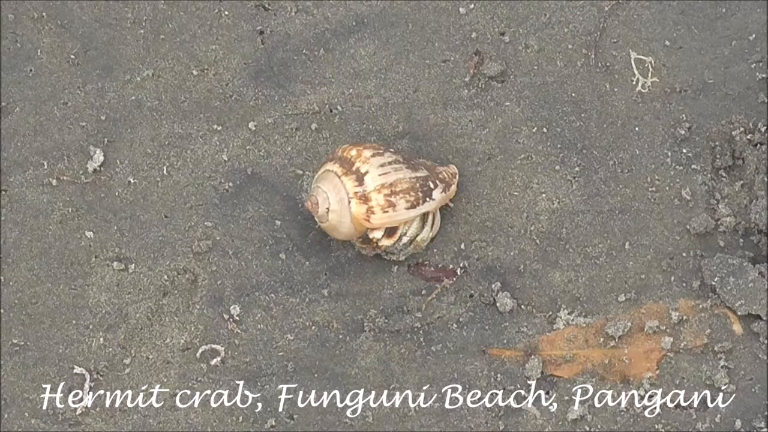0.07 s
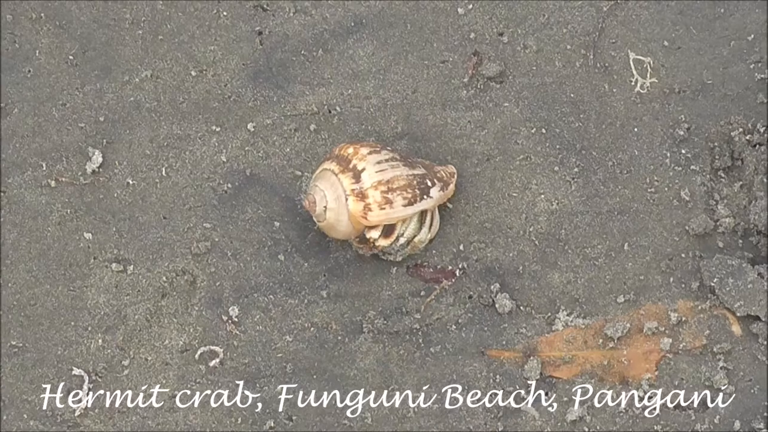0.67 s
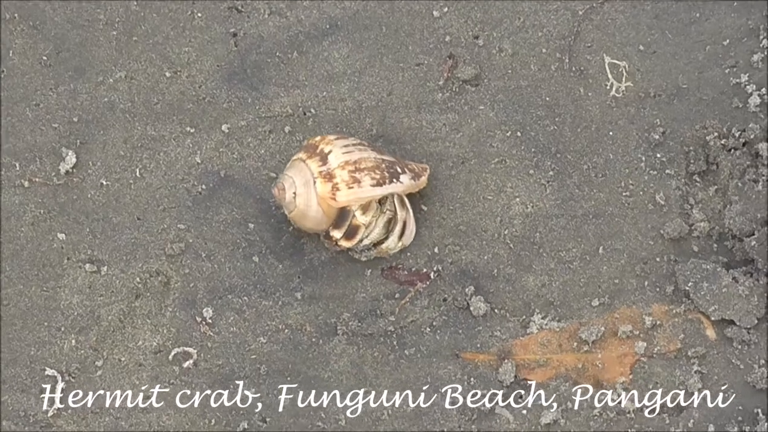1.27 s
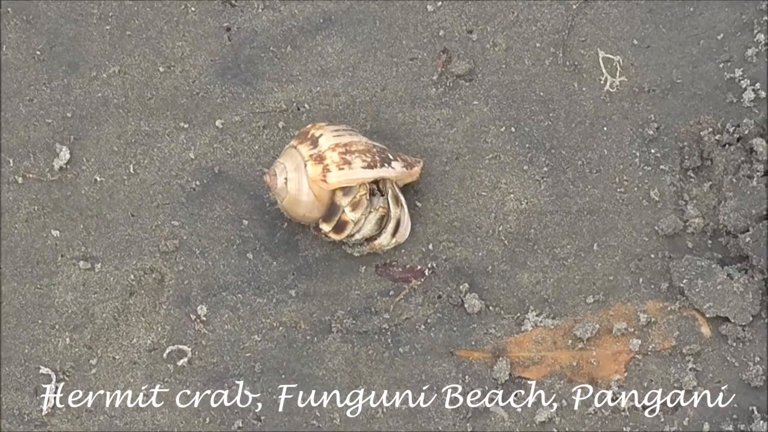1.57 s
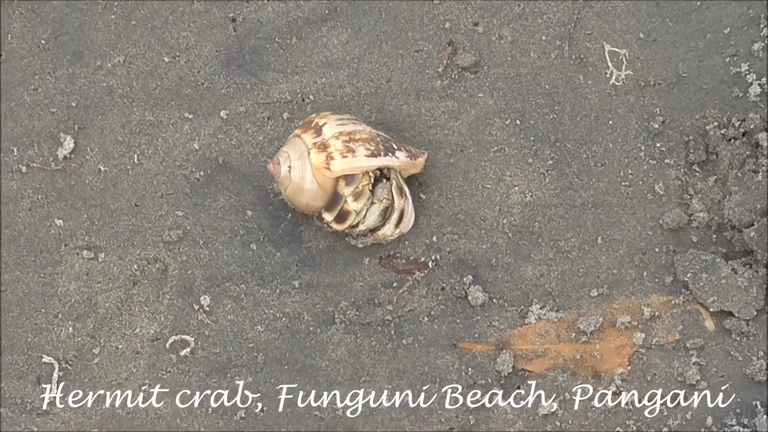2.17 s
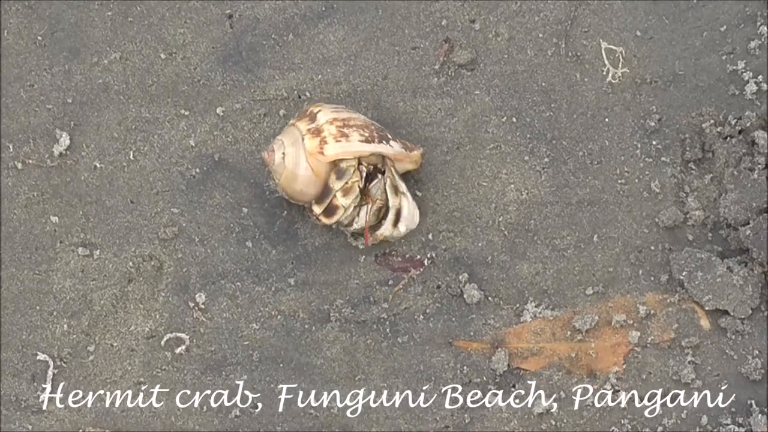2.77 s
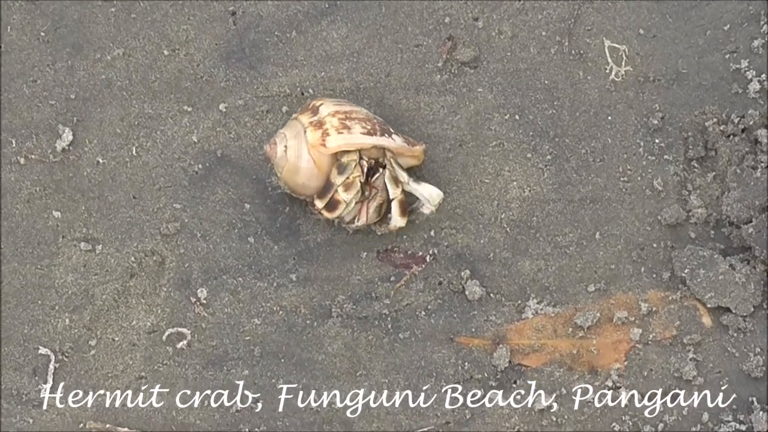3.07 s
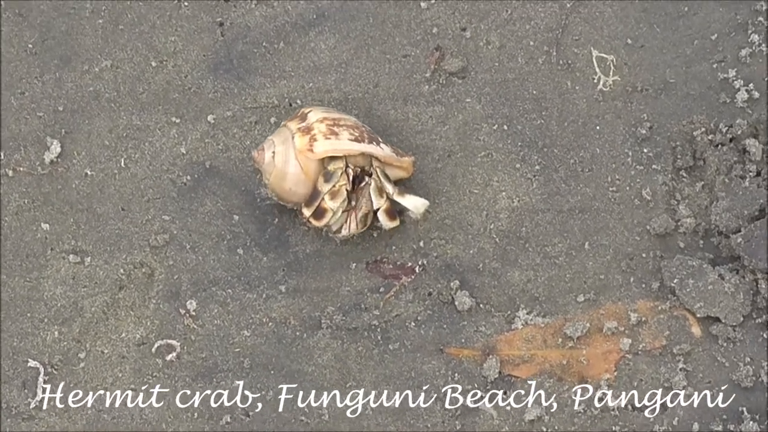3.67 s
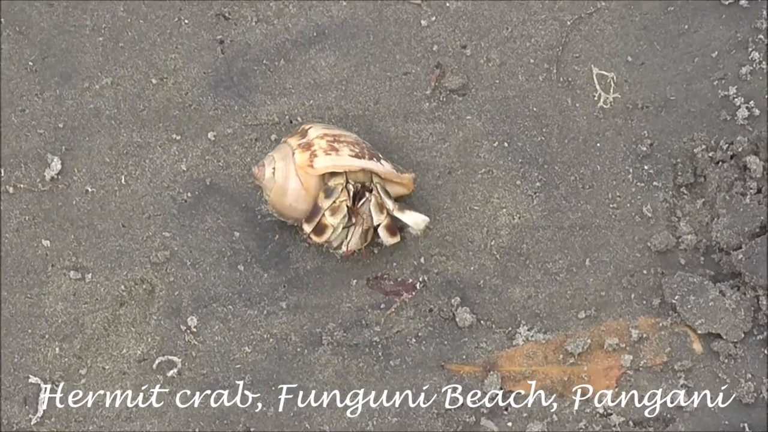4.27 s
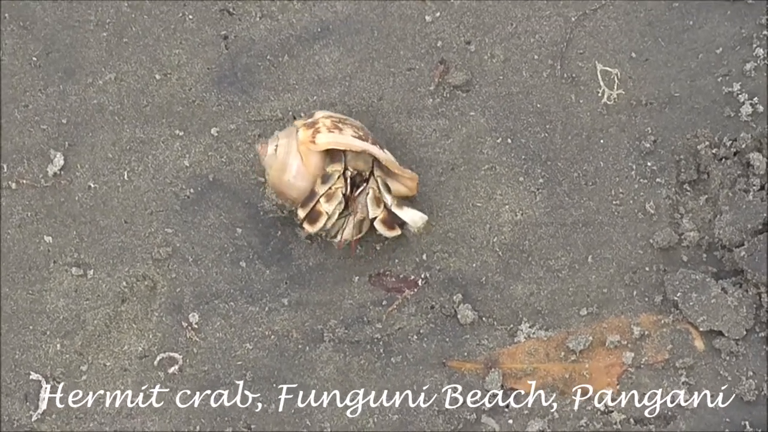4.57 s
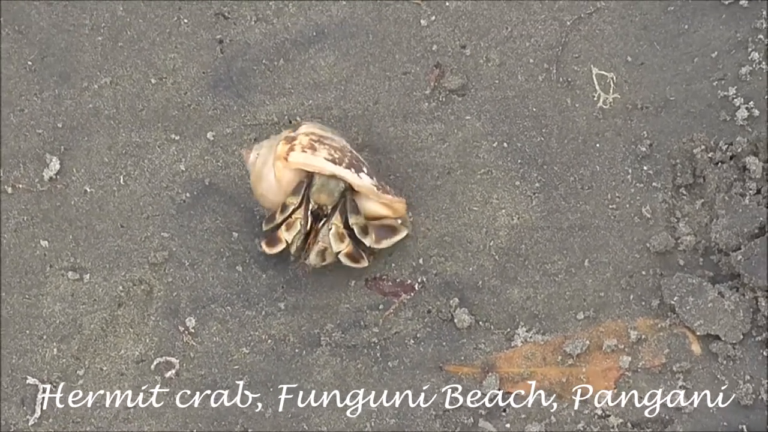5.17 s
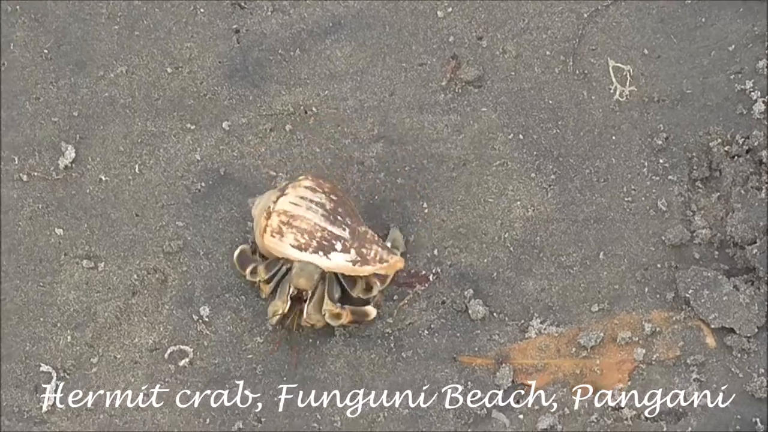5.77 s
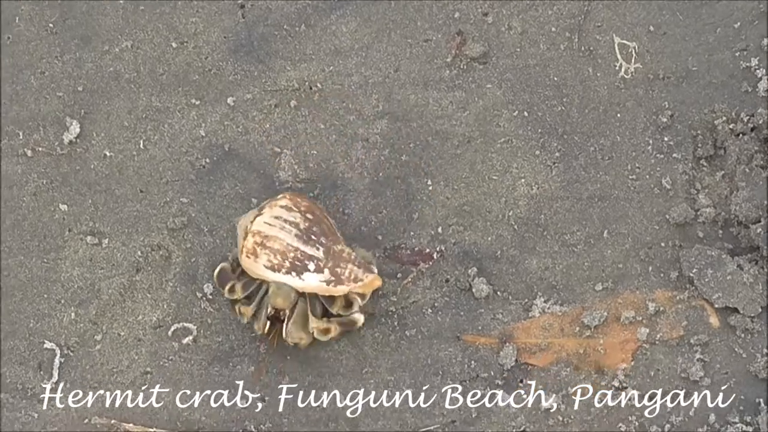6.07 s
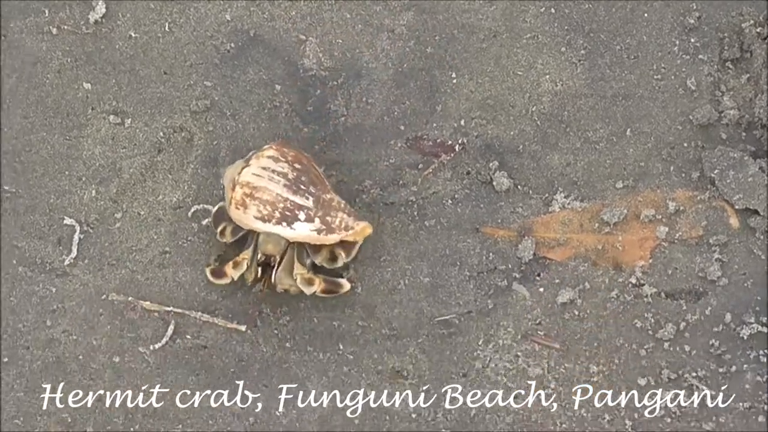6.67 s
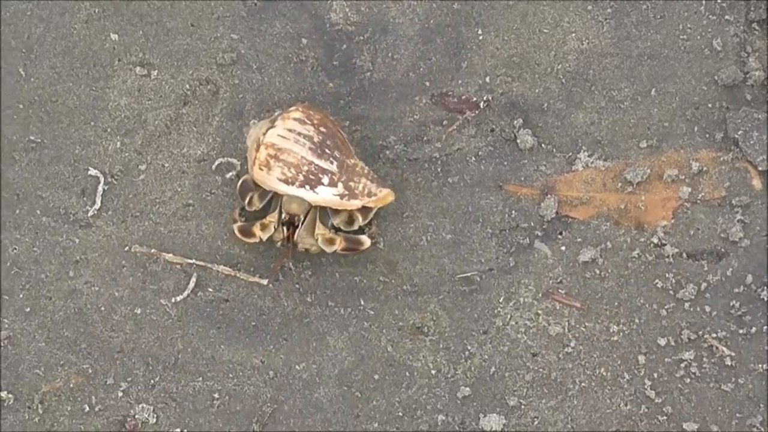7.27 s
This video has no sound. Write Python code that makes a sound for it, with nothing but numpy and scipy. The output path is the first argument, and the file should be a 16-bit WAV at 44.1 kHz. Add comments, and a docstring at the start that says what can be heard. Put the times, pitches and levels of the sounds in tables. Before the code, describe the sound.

Distant surf roars steadily on a sandy beach while gusts rumble on the microphone and a foam hiss slowly grows.

```python
"""A wide sandy beach, heard from the wet sand through a small stereo camera microphone.
Clouds of bubbles in distant breaking waves merge into one slowly swelling roar.
A gusty breeze rumbles on the microphone openings, and foam hisses as it spreads up the shore.
Twice a grain of grit ticks faintly on the camera housing."""
import sys
import numpy as np
from scipy import signal
from scipy.fft import rfft, irfft, next_fast_len
from scipy.io import wavfile

SR = 44100
rng = np.random.default_rng(int(sys.argv[2]) if len(sys.argv) > 2 else 0)


def to_wav(s):
    """Save 16-bit WAV."""
    ch = np.atleast_2d(s).T  # columns
    pcm = np.round(np.clip(ch, -1, 1) * 32767)  # PCM
    wavfile.write(sys.argv[1], SR, pcm.astype(np.int16))


N = 326781
TIME = np.arange(N) / SR
FFT_SIZE = next_fast_len(N)
FREQS = np.maximum(np.fft.rfftfreq(FFT_SIZE, 1 / SR), 1)


def breakers(lull_db=-22.5, bright_db=0.5):
    """Big bubble clouds roar; a breaking wave lifts their deep part first and most."""
    # The tone of the roar. Each row: frequency in Hz, relative level in dB.
    roar_spectrum = [(25, -35), (60, -19), (110, -7.5), (190, -1.04), (325, 0.7), (500, -1), (740, -2.5),
                     (890, -5), (1010, -8.5), (1400, -12.5), (1650, -18.5), (2150, -19.5), (2500, -29),
                     (3500, -49)]
    # Parts of the crest collapse and briefly change the roar.
    # Each row: peak time in seconds, deep lift in dB, bright lift in dB, length in seconds.
    surges = [(1.02, 0.2, 0.7, 0.64), (1.603, 1.3, 0.3, 0.21), (2.48, 0, 0.5, 0.36),
              (4.05, 0.3, -0.7, 0.35), (4.715, 1.7, 0.5, 0.3), (5.21, 3, 0, 0.25), (5.84, 0, 0.5, 0.22),
              (6.55, 1.8, 0, 0.3)]
    deep_surge_db = sum(lift_db * hump(peak_s, length_s) for peak_s, lift_db, _, length_s in surges)
    bright_surge_db = sum(lift_db * hump(peak_s, length_s) for peak_s, _, lift_db, length_s in surges)
    deep_level_db = lull_db + deep_surge_db + wave_lift(lift_db=3.5, build_s=0.18)
    bright_level_db = lull_db + bright_db + bright_surge_db + wave_lift(lift_db=3.0, build_s=1.8)
    roar = bubble_noise(roar_spectrum, churn_db=0.1, churn_hz=14)
    return swell(roar, deep_level_db, bright_level_db, split_hz=510)


def wave_lift(lift_db, build_s, break_s=2.86, ebb_db_per_s=0.3):
    """The decibels a breaking wave adds to the roar: they build up, then slowly ebb."""
    age = np.maximum(TIME - break_s, 0)
    return lift_db * (1 - np.exp(-age / build_s)) - ebb_db_per_s * age


def breeze(level_db=-29.5, left_db=2.0, bright_db=-34.0, bright_growth=2.5):
    """Swirls of air push on the two openings in opposite ways; strong gusts sound brighter."""
    # The tone of the rumble. Each row: frequency in Hz, relative level in dB.
    rumble_spectrum = [(20, -23), (40, -13), (65, 1), (95, 4.5), (160, 4), (240, -7.5), (330, -16),
                       (500, -29), (1000, -42)]
    # Gusts swell and die away. Each row: peak time in seconds, lift in dB, length in seconds.
    gusts = [(0.81, 10.5, 0.9), (1.72, 8, 0.6), (1.98, 6.5, 0.28), (2.425, 8.5, 0.81), (2.684, 4, 0.14),
             (2.87, 3.5, 0.3), (3.2, 7.5, 0.71), (3.498, 5, 0.28), (3.77, 5, 0.13), (3.925, 2, 0.1),
             (4.15, 7, 0.81), (4.382, 3.5, 0.26), (4.76, 6.5, 0.61), (5.048, 7.5, 0.12), (5.28, 3.5, 0.45),
             (5.65, 5.5, 0.7), (6.75, 5.5, 0.079), (7.36, 0, 0.2)]
    swirls = irfft(noise_pair(likeness=-0.96) * tone_gain(rumble_spectrum), FFT_SIZE)[:, :N]
    flutter = from_db(0.7 * drift(rate_hz=12))
    balance = from_db([[left_db], [-left_db]])  # the left opening faces the wind
    rumble = rms_one(swirls * flutter * balance)
    gust_db = sum(lift_db * hump(peak_s, length_s) for peak_s, lift_db, length_s in gusts)
    return swell(rumble, level_db + gust_db, bright_db + bright_growth * gust_db, split_hz=310)


def foam(level_db=-38, top_db=-37.5, top_share=0.23, start_s=1.66, stop_s=6.6, growth_db_per_s=0.72):
    """Tiny bursting bubbles blur into a hiss that grows as the foam spreads, least in the top treble."""
    # The hiss as heard through the camera, with a dip near 10.7 kHz from audio compression.
    # Each row: frequency in Hz, relative level in dB.
    heard_spectrum = [(1410, -11), (2400, -10.5), (2840, -9), (3250, -5.5), (3570, -7), (4000, -3),
                      (4500, -2), (4850, 0), (5200, -2), (5600, -2), (7230, -12.5), (9500, -14.5),
                      (10700, -23.5), (11800, -23.5), (13800, -30.5), (14800, -37), (16000, -51)]
    # Tongues of foam run closer. Each row: peak time in seconds, lift in dB, length in seconds.
    washes = [(4.08, 1.0, 0.54), (6.9, 0.7, 0.55)]
    spread_db = growth_db_per_s * (np.clip(TIME, start_s, stop_s) - start_s)
    spread_db += sum(lift_db * hump(peak_s, length_s) for peak_s, lift_db, length_s in washes)
    hiss = bubble_noise(heard_spectrum, churn_db=0.58, churn_hz=18)
    return swell(hiss, level_db + spread_db, top_db + top_share * spread_db, split_hz=8500)


def bubble_noise(spectrum, churn_db, churn_hz):
    """Countless sea bubbles heard in stereo: each octave wavers a little on its own."""
    # How the sea's sound reaches the two microphone openings. Each row: frequency in Hz,
    # likeness of the sides from 0 to 1, left phase lead in radians, left minus right level in dB.
    stereo_paths = [(150.0, 0.97, 0.0, 0.0), (380.0, 0.94, 0.0, -0.1), (660.0, 0.965, 0.2, -1.8),
                    (940.0, 0.945, 0.68, 0.0), (1350.0, 0.92, 0.35, 1.6), (1750.0, 0.73, 0.61, 3.7),
                    (2000.0, 0.88, 0.1, 2.8), (3500.0, 0.85, 0.52, 1.5), (5000.0, 0.95, 0.34, 0.2),
                    (6400.0, 0.85, 0.68, -1.2), (8000.0, 0.64, 1.65, -1.4), (10800.0, 0.77, 3.02, 0.4),
                    (13000.0, 0.47, 0.23, 0.4)]
    likeness, lead, balance_db = at_each_frequency(stereo_paths)
    sides = np.array([[0.5], [-0.5]])
    placement = from_db(sides * balance_db) * np.exp(1j * sides * lead)
    bubbles = noise_pair(likeness) * tone_gain(spectrum) * placement
    octave = np.clip(np.log2(FREQS), 6, 14)
    out = np.zeros((2, N))
    for centre in range(6, 15):  # octaves from 64 to 16384 Hz
        band = irfft(bubbles * np.maximum(1 - abs(octave - centre), 0), FFT_SIZE)[:, :N]
        out += band * from_db(churn_db * drift(churn_hz))
    return rms_one(out)


def grit_ticks(decay_s=0.0001, low_cut_hz=3000):
    """Each grain of grit that hits the housing gives one very short, bright snap."""
    # Each row: start in seconds, peak level in dB, left minus right level in dB.
    hits = [(5.4233, -22, 0), (6.6845, -21, -7)]
    age = np.arange(512) / SR
    low_cut = signal.butter(2, low_cut_hz, "high", fs=SR, output="sos")
    snap = signal.sosfilt(low_cut, np.exp(-age / decay_s))
    snap /= abs(snap).max()
    out = np.zeros((2, N))
    for start_s, peak_db, balance_db in hits:
        at = round(start_s * SR)
        gains = from_db([[peak_db + balance_db / 2], [peak_db - balance_db / 2]])
        out[:, at:at + len(snap)] += gains * snap
    return out


def from_db(db):
    """Turn decibels into a gain to multiply by."""
    return 10 ** (np.asarray(db) / 20)


def rms_one(x):
    """Scale a signal so that its average strength (rms) is 1."""
    return x / np.sqrt(np.mean(x ** 2) + 1e-20)


def at_each_frequency(rows):
    """Fill in a table's columns between its rows, on a log frequency scale."""
    hz, *columns = np.transpose(rows)
    return [np.interp(np.log(FREQS), np.log(hz), column) for column in columns]


def tone_gain(spectrum):
    """The gain at every frequency, falling steeply beyond the ends of the spectrum."""
    below = np.minimum(FREQS / spectrum[0][0], 1)
    above = np.minimum(spectrum[-1][0] / FREQS, 1)
    return from_db(at_each_frequency(spectrum)[0]) * (below * above) ** 2


def drift(rate_hz):
    """A smooth random wander with a typical size of 1."""
    step, warm_up = 40, 2000  # one value every 40 samples; skip the first while the filter settles
    pole = np.exp(-2 * np.pi * rate_hz * step / SR)
    noise = rng.standard_normal(N // step + warm_up + 2)
    slow = signal.lfilter([1], [1, -2 * pole, pole * pole], noise)[warm_up:]
    return np.interp(np.arange(N) / step, np.arange(len(slow)), rms_one(slow))


def noise_pair(likeness):
    """Left and right spectra of white noise: alike near a likeness of 1, opposite near -1."""
    mid, side = rfft(rng.standard_normal((2, FFT_SIZE)))
    return np.sqrt(1 + likeness) * mid + np.sqrt(1 - likeness) * side * [[1], [-1]]


def swell(x, deep_db, bright_db, split_hz):
    """Play the deep and the bright part of a sound, each at its own changing level."""
    deep = signal.sosfiltfilt(signal.butter(2, split_hz, fs=SR, output="sos"), x)
    return deep * from_db(deep_db) + (x - deep) * from_db(bright_db)


def hump(peak_s, length_s):
    """A smooth rise from 0 to 1 and back."""
    return np.cos(np.pi * np.clip((TIME - peak_s) / length_s, -0.5, 0.5)) ** 2


def scene():
    """Sea, breeze and ticks together."""
    return breakers() + foam() + breeze() + grit_ticks()


def record(dry, start_s=0.646, fade_s=0.002, cutoff_hz=15600):
    """The sound switches on after a short silence, and the highest treble is cut."""
    switched_on = np.clip((TIME - start_s) / fade_s, 0, 1)
    high_cut = signal.ellip(10, 0.1, 90, cutoff_hz, fs=SR, output="sos")
    return signal.sosfilt(high_cut, dry * switched_on)


dry = scene()
out = record(dry)
to_wav(out)
```